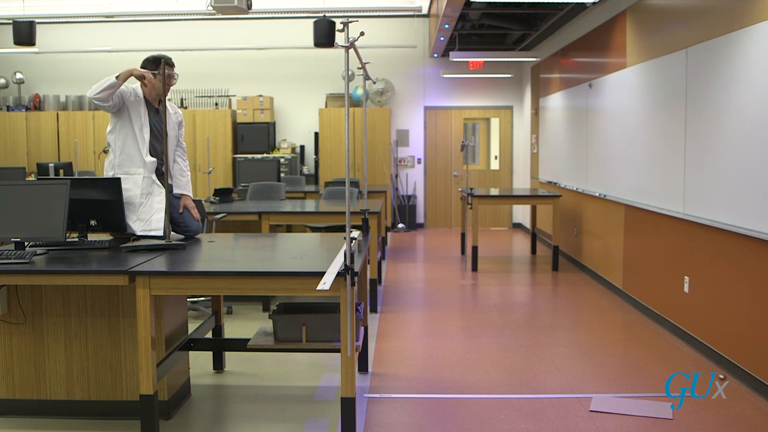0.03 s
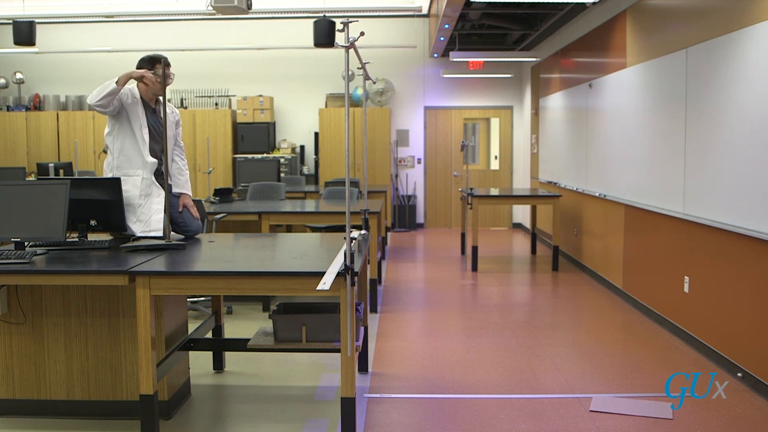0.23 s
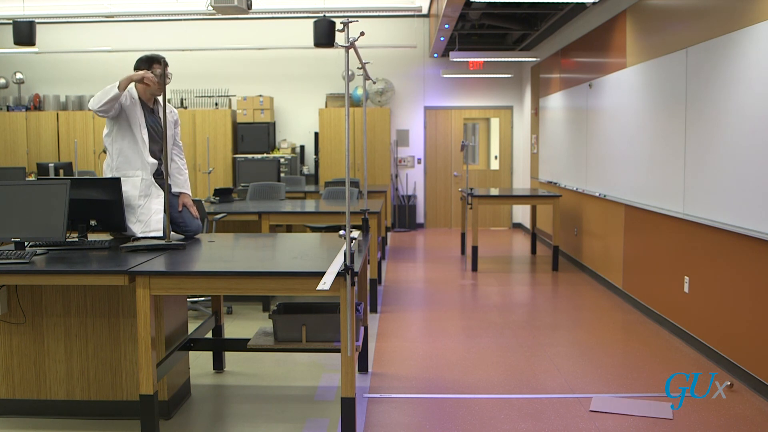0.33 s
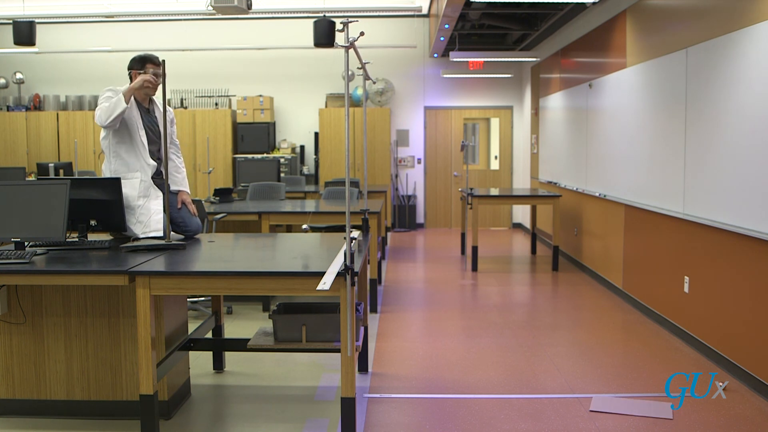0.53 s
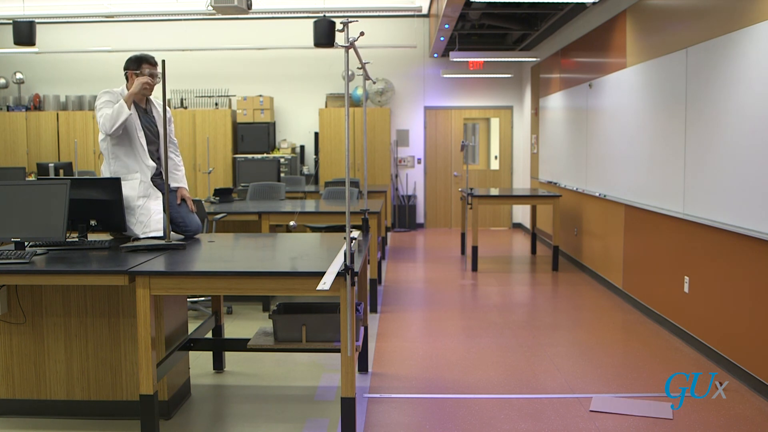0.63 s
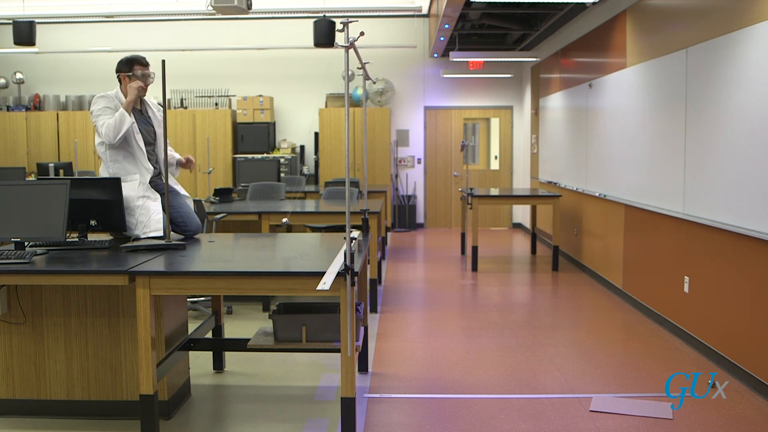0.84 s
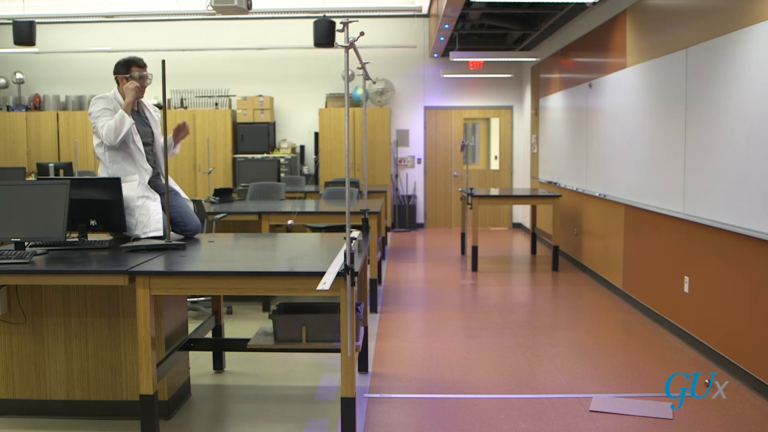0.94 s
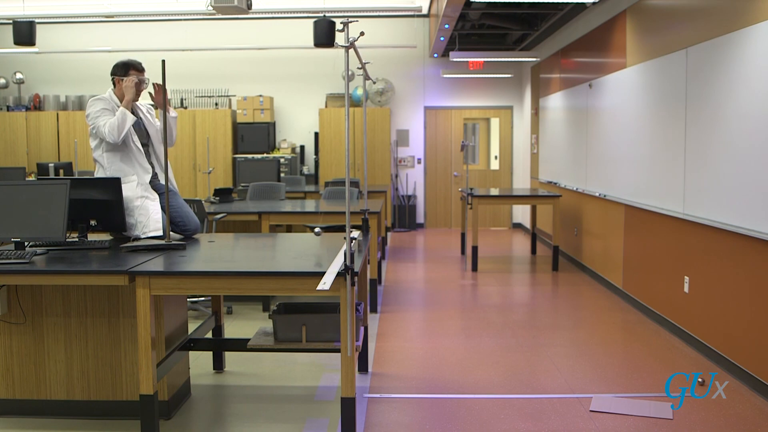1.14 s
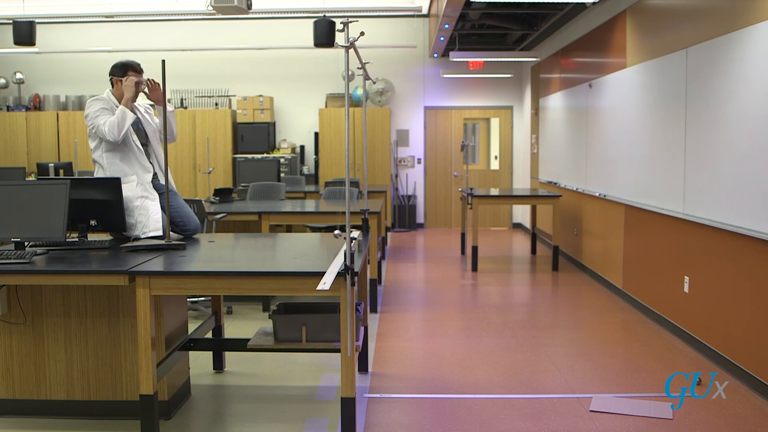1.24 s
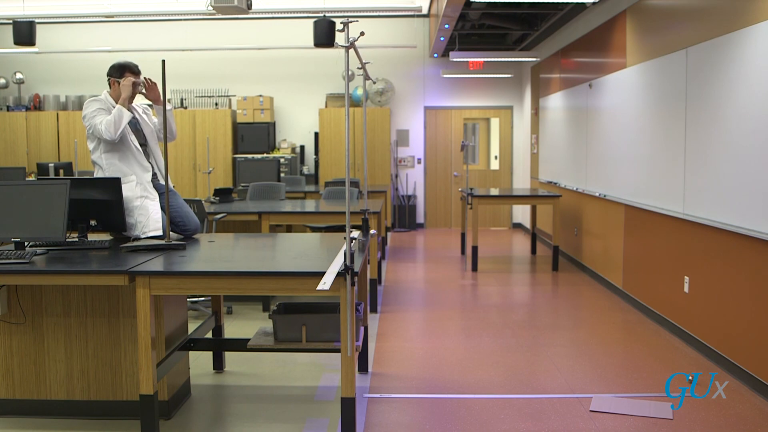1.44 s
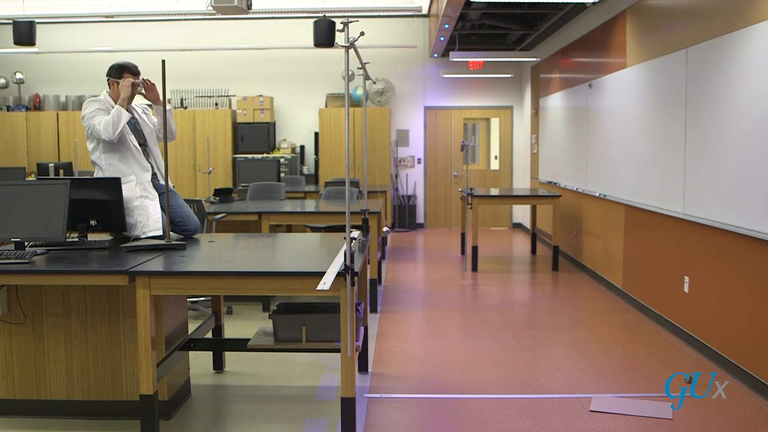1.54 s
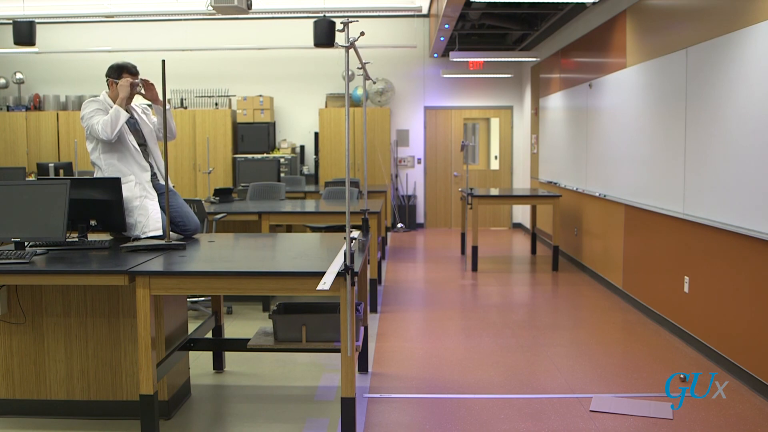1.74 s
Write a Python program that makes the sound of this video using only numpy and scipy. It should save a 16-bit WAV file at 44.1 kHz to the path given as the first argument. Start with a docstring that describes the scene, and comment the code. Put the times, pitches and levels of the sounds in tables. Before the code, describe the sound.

A hard ball strikes a bench and lands with two sharp knocks in an echoing room.

```python
"""A faint ring dies away in a bare room; after a soft tap, a small hard ball strikes a laboratory bench
with a deep thud and a bright click. It flies off, lands on the hard floor with a sharp knock and knocks
once more. Each impact excites damped modes of the ball and the surface, and the room reverberates,
losing its treble first. A coat rustles faintly over the steady noise of the ventilation."""
import sys
import numpy as np
from scipy import signal
from scipy.fft import rfft, irfft
from scipy.io import wavfile

SR = 44100
rng = np.random.default_rng(int(sys.argv[2]) if len(sys.argv) > 2 else 0)


def wav_out(sig):
    """Save sig, one row per channel (or a flat mono array), as 16-bit PCM at SR to the path in sys.argv[1]."""
    wavfile.write(sys.argv[1], SR, np.round(np.clip(np.atleast_2d(sig).T, -1, 1) * 32767).astype(np.int16))


N = 79380
TIME, BIN_HZ = np.arange(N) / SR, np.fft.rfftfreq(N, 1 / SR)
CONTACT_RISE_S, CRACK_RISE_S, MODE_RISE_S, ROOM_RISE_S = .00061, .002, .0039, .008


def bench_thud():
    """Impact excitation: the heavy bench top bends, rings in its modes and fills the room with bass."""
    # Each row: start in seconds, level in dB, contact cut-off in Hz, room level in dB.
    hits = [(0.2096, 0.5, 9000, 0)]
    # Each row: mode frequency in Hz, level in dB, decay time T60 in seconds.
    modes = [(116.7, -24.5, .2), (174, -22.5, 0.14), (196, -29, .16), (289, -37, .6), (340.5, -39, .5),
             (489, -24, 0.04), (565.7, -25, 0.033), (973, -31, .12), (1262, -33.5, 0.068),
             (1683, -26.5, .12), (2090, -33.5, 0.26)]
    # Reflections from near furniture. Each row: delay in seconds, level in dB.
    echoes = [(.0036, -12), (.0098, -4.5), (0.0139, -10.5), (.0202, -18)]
    # First pulse, dense short ring and room response. Each row: frequency in Hz, spectral level in dB.
    push_spectrum = [(30, -28), (65, -31.5), (105, -3.5), (175, 5), (270, -13.5), (370, -16), (490, -5),
                     (610, -5), (760, -18), (1100, -16.5), (2200, -39.5), (3000, -24), (3800, -44.5),
                     (16000, -59)]
    crack_spectrum = [(40, -18.5), (70, -18.5), (150, 2), (350, -11.5), (600, 1.5), (1200, -18),
                      (2500, -17.5), (4500, -34.5), (10000, -33.5), (16000, -43)]
    room_spectrum = [(35, -24), (65, -19), (100, -5.5), (180, 0), (280, 2.5), (500, -6), (1000, -9),
                     (2000, -19.5), (3000, -28.5), (4200, -34), (8000, -42), (12000, -39), (16000, -52.5)]
    push = from_db(-15.5) * bending_pulse(push_spectrum)
    crack = from_db(-17) * burst(crack_spectrum, CRACK_RISE_S, t60=.1)
    near = with_echoes(push, echoes) + ring(modes, MODE_RISE_S) + crack
    # The bench is near, so the room's bass takes longer to gather.
    far = from_db(-18.5) * reverberation(room_spectrum, rise_s=.025)
    return sum(strike(near, far, *hit) for hit in hits)


def ball_click():
    """Modal radiation: high, heavily damped modes click as the ball leaves the bench."""
    # Each row: start in seconds, level in dB, contact cut-off in Hz, room level in dB.
    hits = [(0.2129, 0.5, 14000, -9.5)]
    # Each row: mode frequency in Hz, level in dB, decay time T60 in seconds.
    modes = [(3065, -18, .018), (3275, -25, 0.023), (7420, -28.5, .02), (7430, -40, .014),
             (11240, -44, 0.059)]
    # A splash of treble. Each row: frequency in Hz, spectral level in dB.
    crack_spectrum = [(500, -31), (3000, 1.5), (6000, 0), (10000, -2.5), (14000, -3.5), (16000, -5)]
    crack = from_db(-38) * burst(crack_spectrum, CONTACT_RISE_S, t60=.09)
    near = ring(modes, CONTACT_RISE_S) + crack
    return sum(strike(near, in_room(near), *hit) for hit in hits)


def floor_knocks():
    """Hard-on-hard impact: ball and floor ring together in two knocks of two touches each."""
    # Each row: start in seconds, level in dB, contact cut-off in Hz, room level in dB.
    hits = [(1.3993, -18.5, 6930, -15), (1.4012, -2, 11400, 1.5), (1.4953, -9.5, 2420, 2),
            (1.5043, -15, 3520, 4)]
    # Joint modes and the contact's snap. Each row: frequency in Hz, level in dB, T60 in seconds.
    modes = [(85.4, -37.5, 0.56), (208, -36, 0.93), (389, -35, 0.6), (474, -18.5, 0.2), (634, -36, 0.18),
             (689, -35.5, 0.51), (798, -31, 0.43), (975, -19.5, 0.15), (1201, -34, .3), (1294, -34, 0.44),
             (1664, -40, 0.41), (1950, -45, 0.11), (2574, -56, 0.14)]
    snap = [(9200, -22.5, 0.0016)]
    # Reflections from near furniture. Each row: delay in seconds, level in dB.
    echoes = [(.0055, -16), (0.0111, -16.5), (0.0199, -19), (0.0236, -9)]
    # First pulse, dense short ring and room response. Each row: frequency in Hz, spectral level in dB.
    push_spectrum = [(40, -12.5), (150, -14), (330, -14), (530, 0), (800, 2), (940, -24), (1400, -3.5),
                     (1950, -18.5), (2400, -7), (2850, -14.5), (3300, -31.5), (4400, -20), (5800, -42),
                     (11000, -44), (16000, -57)]
    crack_spectrum = [(40, 0), (130, -12), (280, 4.5), (550, 9), (1000, -9.5), (2400, 0.5), (3300, -11),
                      (4600, -14.5), (6000, -24), (11000, -37), (15000, -49)]
    room_spectrum = [(35, -22), (60, -4), (88, -4), (145, -24), (210, -0.5), (290, -5.5), (480, -4),
                     (800, 0), (1400, -4.5), (2700, -11.5), (4200, -20), (7000, -32.5), (11000, -35),
                     (16000, -44)]
    direct = from_db(-15.5) * bending_pulse(push_spectrum) + ring(snap, rise_s=.0001)
    ball_ping = ring([(15560, -48, .22)], CONTACT_RISE_S)
    crack = from_db(-17) * burst(crack_spectrum, CRACK_RISE_S, t60=.12)
    near = with_echoes(direct, echoes) + ring(modes, MODE_RISE_S) + ball_ping + crack
    knocks = 0
    for hit in hits:
        far = from_db(-27) * reverberation(room_spectrum, ROOM_RISE_S)
        knocks = knocks + strike(near, far, *hit)
    return knocks


def strike(near, far, start_s, db, contact_hz, room_db):
    """Contact compliance acts as a low-pass: a softer blow dulls both direct and room sound."""
    contact = signal.butter(1, min(contact_hz, .45 * SR), fs=SR, output="sos")
    blow = signal.sosfilt(contact, near + from_db(room_db) * far)
    return from_db(db) * delayed(blow, start_s)


def bending_pulse(spectrum):
    """Dispersion in a plate: low bending waves travel more slowly, so the pulse's bass trails."""
    travel_s, reference_hz = .0009, 985  # group delay at this frequency
    first_half = np.arange(N) < N / 2
    cepstrum = irfft(np.log(from_db(at_hz(spectrum, BIN_HZ))), N)
    minimum_phase = np.exp(rfft(2 * cepstrum * (TIME > 0) * first_half))
    lag_cycles = 2 * travel_s * np.sqrt(BIN_HZ * reference_hz)
    pulse = irfft(minimum_phase * np.exp(-2j * np.pi * lag_cycles), N) * first_half
    return pulse / np.linalg.norm(pulse) * np.sqrt(.01 * SR)  # the energy of 10 ms at rms 1


def ring(modes, rise_s):
    """Modal superposition: a struck body sounds as a sum of damped sines, here alternating in sign."""
    sines = sum((-1) ** k * from_db(db - 60 * TIME / t60) * np.sin(2 * np.pi * hz * TIME)
                for k, (hz, db, t60) in enumerate(modes))
    return sines * onset(rise_s)


def burst(spectrum, rise_s, t60):
    """Modal overlap: crowded modes merge into noise that swells and dies at one rate."""
    return noise(spectrum) * onset(rise_s) * from_db(-60 * TIME / t60)


def with_echoes(x, echoes):
    """Early reflections: delayed, weaker copies add to the direct sound."""
    return x + sum(from_db(db) * delayed(x, delay_s) for delay_s, db in echoes)


def in_room(x):
    """Convolution with the room's impulse response gives a body's diffuse echo."""
    tail = reverberation([(20, 0), (20000, 0)], ROOM_RISE_S)
    return from_db(-9) * signal.fftconvolve(x, tail / np.linalg.norm(tail))[:N]


def reverberation(spectrum, rise_s):
    """A diffuse field builds up, then decays exponentially in each band, the treble fastest."""
    # Each row: frequency in Hz, reverberation time T60 in seconds.
    room_t60 = [(60, .8), (140, 0.7), (260, .85), (500, 0.65), (1200, .62), (2700, 0.6), (5000, 0.51),
                (9000, .37), (15000, 0.24)]
    field = rfft(noise(spectrum))
    centres_hz = np.geomspace(60, 15000, 10)
    tail = 0
    for centre, share in zip(centres_hz, np.eye(len(centres_hz))):
        band = irfft(field * at_hz(np.c_[centres_hz, share], BIN_HZ), N)
        tail = tail + band * from_db(-60 * TIME / at_hz(room_t60, centre))
    return tail * onset(rise_s)


def dying_ring():
    """Free decay: the room is still releasing the energy of an earlier sound."""
    # Each row: frequency in Hz, spectral level in dB.
    spectrum = [(60, -16.5), (370, 2), (700, -6.5), (1700, -5.5), (2400, -7.5), (3000, -15.5), (3700, 0.5),
                (4200, -8.5), (4800, -8), (6200, -19.5), (8500, -18), (16000, -35.5)]
    return from_db(-48.5) * reverberation(spectrum, CONTACT_RISE_S)


def soft_tap():
    """A damped noise transient, soft in its attack, comes just before the thud."""
    # Each row: frequency in Hz, spectral level in dB.
    spectrum = [(60, -3.5), (300, 0), (1000, 7), (1800, 0), (2800, -12.5), (4000, -16.5), (6000, -42),
                (16000, -43)]
    return from_db(-48) * delayed(burst(spectrum, rise_s=.009, t60=.3), seconds=.174)


def coat_rustle():
    """Friction in moving cloth gives swells of broadband noise and small ticks."""
    # Rustle and tick. Each row: frequency in Hz, spectral level in dB.
    rustle_spectrum = [(60, -5.5), (200, 3.5), (600, -9), (1300, -14), (3000, -19.5), (5000, -16.5),
                       (9000, -21), (14500, -20.5), (16000, -29)]
    tick_spectrum = [(1000, -20), (5000, 1), (11000, 8), (16000, -3)]
    # The rustle's envelope and the single ticks. Each row: time in seconds, level in dB.
    envelope = [(.7, -80.5), (.82, -68), (.91, -75.5), (.96, -64.5), (1.08, -60), (1.14, -66), (1.2, -74.5),
                (1.4, -87.5)]
    ticks = [(.436, -64), (0.897, -61), (1.033, -63), (1.148, -67), (1.371, -68), (1.658, -67)]
    rustle = from_db(np.interp(TIME, *np.transpose(envelope))) * noise(rustle_spectrum)
    return rustle + sum(from_db(db) * delayed(burst(tick_spectrum, CONTACT_RISE_S, t60=.021), start_s)
                        for start_s, db in ticks)


def ventilation():
    """Stationary broadband noise: the ventilation's low rumble under a faint hiss."""
    # Each row: frequency in Hz, spectral level in dB.
    spectrum = [(25, -1.5), (55, -1), (100, 3), (160, -9), (400, -13), (900, -18), (2000, -26.5),
                (5000, -30.5), (14500, -32.5), (16000, -41)]
    return from_db(-65.5) * noise(spectrum)


def noise(spectrum):
    """Random phases turn a spectral shape into noise of rms 1."""
    phases = np.exp(2j * np.pi * rng.random(len(BIN_HZ)))
    x = irfft(from_db(at_hz(spectrum, BIN_HZ)) * phases, N)
    return x / x.std()


def onset(rise_s):
    """Amplitude builds smoothly from 0 to 1."""
    return 1 - np.exp(-(TIME / rise_s) ** 2)


def delayed(x, seconds):
    """A pure delay, cut to the scene's length."""
    return np.concatenate([np.zeros(int(max(seconds, 0) * SR)), x])[:N]


def at_hz(points, hz):
    """Interpolation on a log-frequency axis."""
    frequencies, values = np.transpose(points)
    return np.interp(np.log(np.maximum(hz, 1)), np.log(frequencies), values)


def from_db(db):
    """Decibels to amplitude ratio."""
    return 10 ** (np.asarray(db) / 20)


def scene():
    """Linear superposition: all sources add at one microphone."""
    impacts = bench_thud() + ball_click() + floor_knocks()
    return (impacts + dying_ring() + soft_tap() + coat_rustle() + ventilation())[None]


def record(dry):
    """Band limiting: a steep elliptic low-pass cuts the treble above 15.9 kHz."""
    return signal.sosfilt(signal.ellip(10, .2, 80, 15900, fs=SR, output="sos"), dry)


dry = scene()
out = record(dry)
wav_out(out)
```